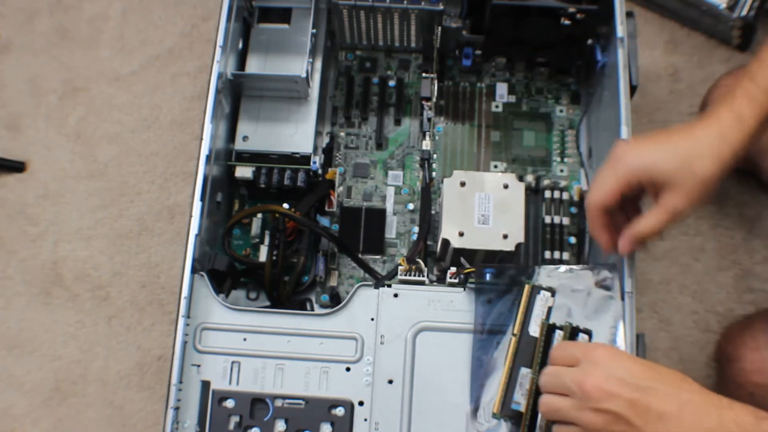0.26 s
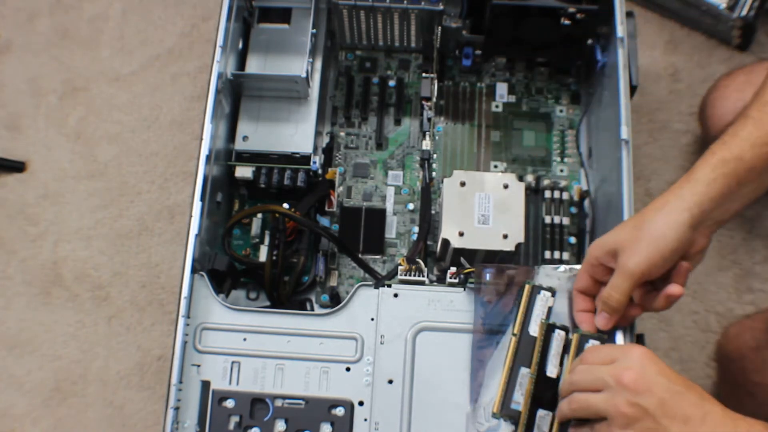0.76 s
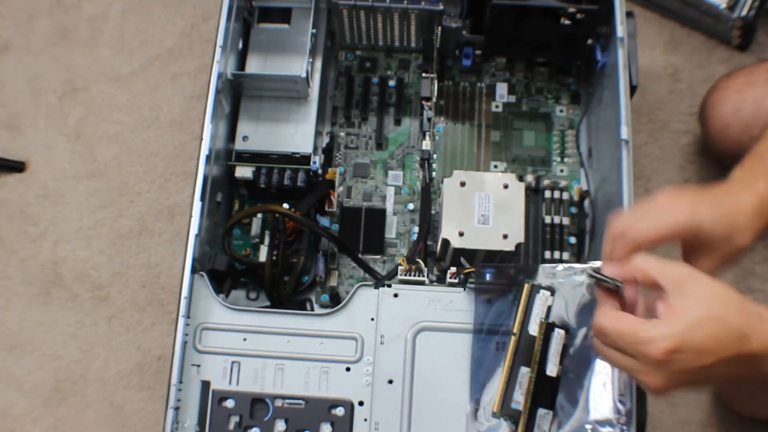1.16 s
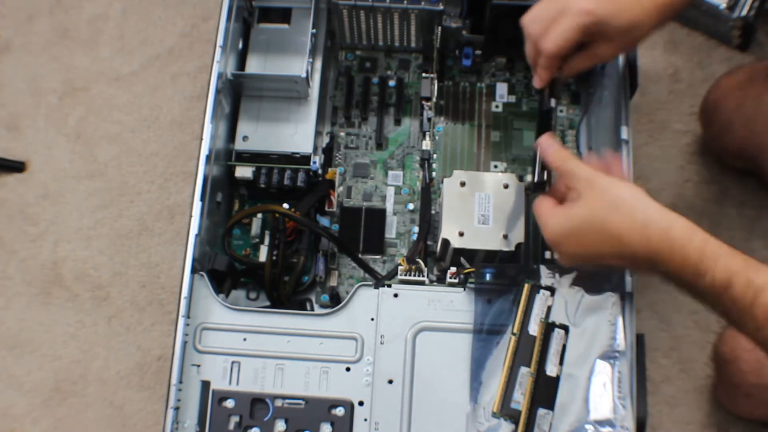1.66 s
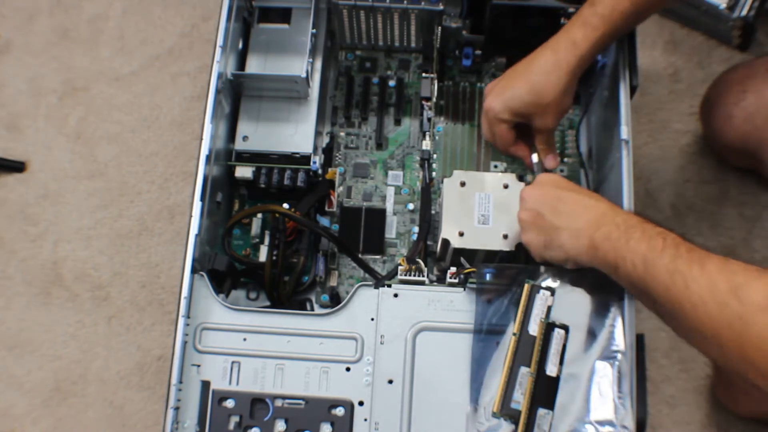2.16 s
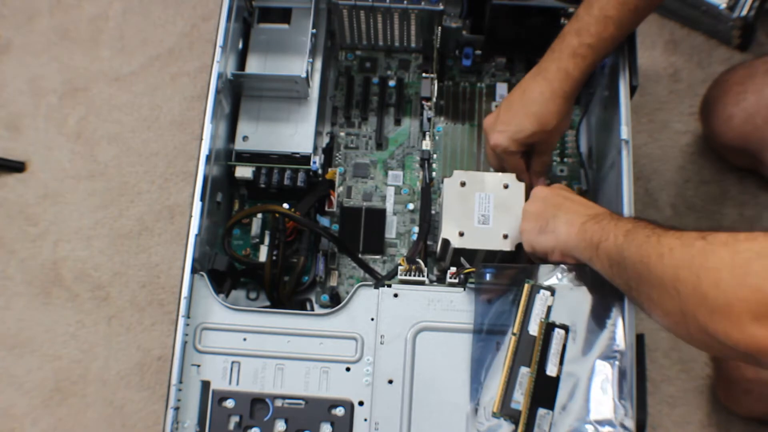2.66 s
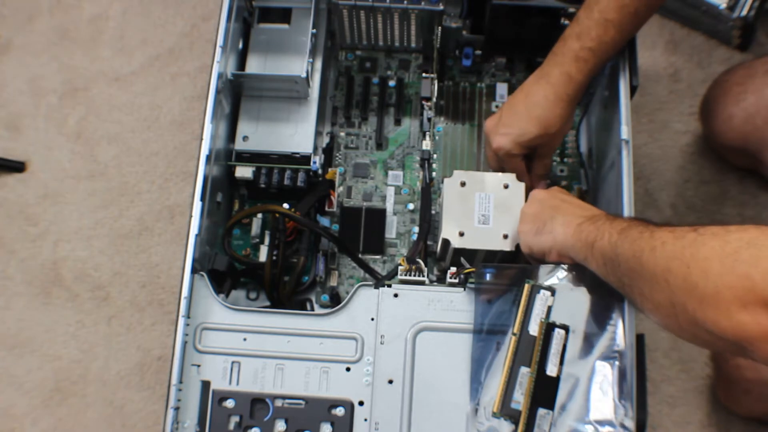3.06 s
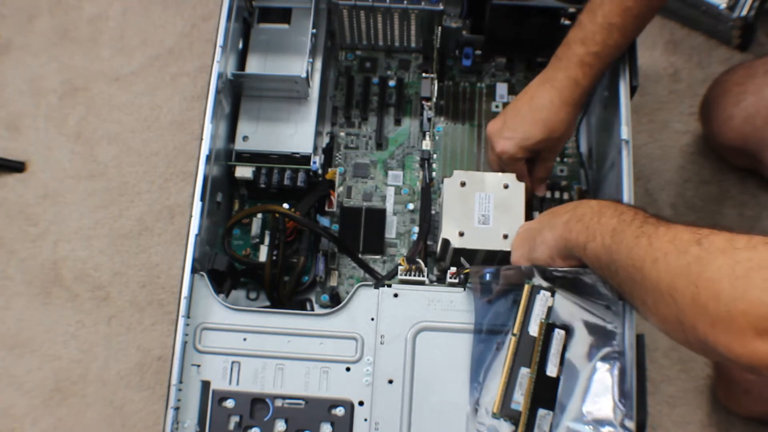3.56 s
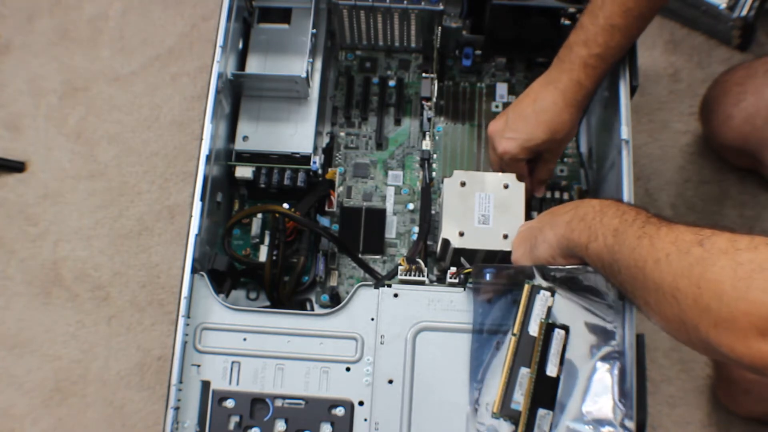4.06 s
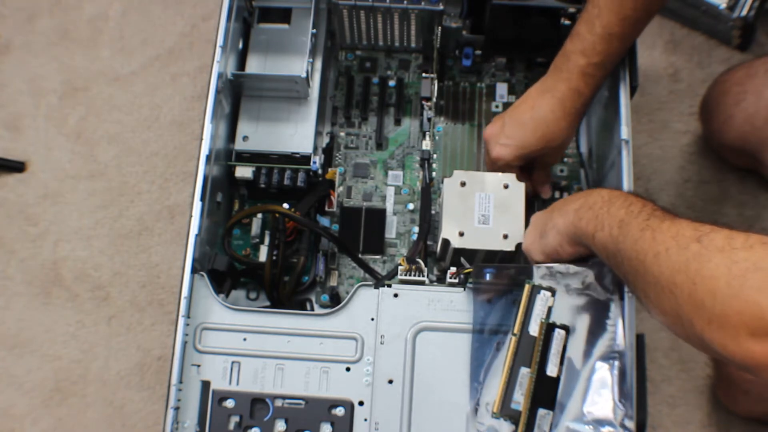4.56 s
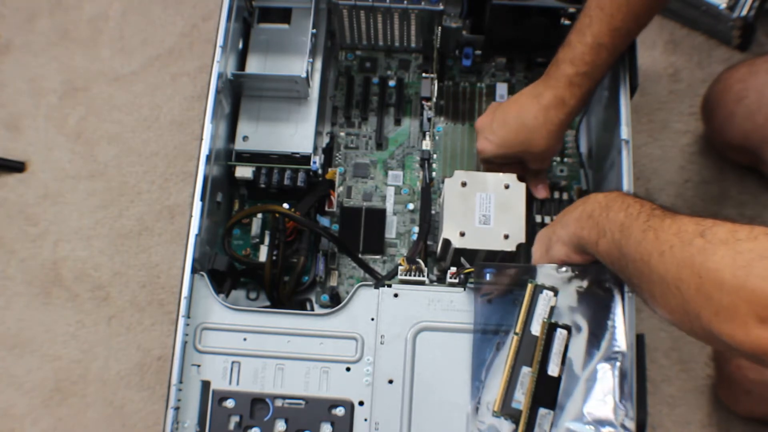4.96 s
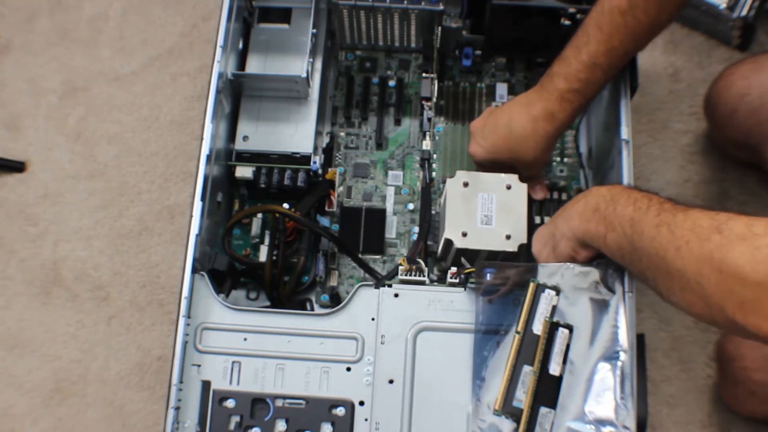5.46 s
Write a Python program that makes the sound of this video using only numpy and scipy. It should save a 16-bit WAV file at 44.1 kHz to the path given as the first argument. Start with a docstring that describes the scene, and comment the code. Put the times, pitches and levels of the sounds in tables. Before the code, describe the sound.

A half-second of low hum and room tone, then a brief cluster of hollow clacks and plastic ticks as modules are picked up from foil. A pause, then light gritty sliding, wiggling and small taps against a circuit board and sheet metal. Quiet pressing ends in one very loud, sharp snap. Close microphone, short room echo, faint hiss.

```python
"""Indoors, close to a steel computer case on carpet: hands lift memory modules off a foil bag lying on it,
slide one into its slot and press until the latch snaps. Bursts of gritty force ring modes of the case,
the panels and the circuit board, with fizz where surfaces rub; plastic and foil tick through single resonances.
Mains hum, shaped room noise and microphone hiss lie below; a gain control ducks after the loudest blows."""
import sys
import numpy as np
from scipy import signal
from scipy.fft import rfft, irfft, next_fast_len
from scipy.io import wavfile
from scipy.ndimage import uniform_filter1d, map_coordinates

SR = 44100
rng = np.random.default_rng(int(sys.argv[2]) if len(sys.argv) > 2 else 0)


def store_wav(level_fs):
    """Save 16-bit WAV to argv[1]."""
    pcm = np.round(np.clip(np.atleast_2d(level_fs), -1, 1) * 32767)
    wavfile.write(sys.argv[1], SR, pcm.T.astype(np.int16))


N = 251370


def amp(db):
    """Decibels to gain."""
    return 10 ** (np.asarray(db) / 20)


def unit(x):
    """Scales a sound to rms 1."""
    return x / np.sqrt(np.mean(np.abs(x) ** 2) + 1e-20)


def along(points, hz):
    """Reads a curve of (Hz, value) points on a log frequency axis."""
    point_hz, values = np.transpose(points)
    return np.interp(np.log(hz + 1), np.log(point_hz + 1), values)


def wobble(rate):
    """A smooth random curve with rate knots a second."""
    knots = rng.standard_normal(int(N * rate / SR) + 4)
    return map_coordinates(knots, [np.arange(N) * rate / SR])


def filtered(x, response):
    """Multiplies the spectrum of x by a response of frequency."""
    m = next_fast_len(N + SR // 2)
    hz = np.fft.rfftfreq(m, 1 / SR)
    return irfft(rfft(x, m) * response(hz), m)[..., :N]


def mains_hum():
    """Mains hum: sines at the supply pitch and its multiples, wavering in level and phase."""
    # Each row: pitch in Hz, level in dB before the 5 dB lift below.
    hum_lines = [(60, -50.5), (120, -66), (240, -63)]
    t = np.arange(N) / SR
    hum = np.zeros(N)
    for hz, db in hum_lines:
        level_db = db + 5.0 + 0.51 * wobble(24) + 0.17 * wobble(5.7)
        hum += amp(level_db) * np.sin(2 * np.pi * hz * t + 0.15 * wobble(12))
    return hum


def room_noise():
    """Room noise, alike at both microphone ports: white noise shaped in frequency."""
    # Each row: frequency in Hz, relative density in dB per Hz.
    room_curve = [(15, -30), (30, -3), (48, -2), (80, -4), (105, -6), (150, -2.5), (250, -0.5), (400, 0),
                  (500, -3.5), (660, -1.5), (900, -3.5), (1400, -6), (1650, -12.5), (2500, -13),
                  (5000, -18), (15700, -22.5)]
    noise = filtered(rng.standard_normal(N), lambda hz: amp(along(room_curve, hz)))
    return amp(-47.5) * unit(noise)  # dB rms


def capsule_hiss():
    """Microphone hiss: shaped noise of opposite sign at the two ports."""
    # Each row: frequency in Hz, relative density in dB per Hz.
    hiss_curve = [(15, -80), (25, -56), (107, 2.5), (413, -2.5), (14500, 0.5), (15700, -4)]
    hiss = unit(filtered(rng.standard_normal(N), lambda hz: amp(along(hiss_curve, hz))))
    return amp(-56.5) * np.array([hiss, -hiss])  # dB rms


def add(out, s, sound):
    """Puts a sound at s seconds with the room's answer, in which each frequency dies at its own speed."""
    # Each row: frequency in Hz, time to die by 60 dB in seconds.
    wall_t60 = [(200, 0.3), (1200, 0.23), (4000, 0.2), (12000, 0.1)]
    hz, t, z = signal.stft(rng.standard_normal(SR // 3), SR, nperseg=256)
    decay = amp(-60 * t / along(wall_t60, hz)[:, None])
    tail = signal.istft(z * decay, SR, nperseg=256)[1]
    echo = signal.fftconvolve(sound, amp(-9.5) * tail / np.linalg.norm(tail))
    out[round(s * SR):][:len(sound)] += sound
    out[round((s + 0.005) * SR):][:len(echo)] += echo  # the walls answer 5 ms later


def ticks():
    """Plastic edges and foil creases: tiny noise cracks, each heard through a broad resonance used twice."""
    # Each row: start in seconds, peak in dB before the room's answer, pitch in Hz.
    tick_rows = [(0.523, -15.5, 3400), (0.5923, -12.5, 6200), (0.681, -42, 7500), (0.736, -25.5, 2600),
                 (0.8026, -27, 2700), (0.833, -24, 5380), (0.8826, -18, 5600), (0.8975, -23, 5670),
                 (0.907, -34, 7000), (1.247, -34, 12500), (1.262, -32, 12500), (1.31, -44, 12000),
                 (2.403, -44, 6000), (3.428, -32, 2100), (4.806, -37, 11100), (4.825, -34.5, 9000),
                 (5.162, -30.5, 4970), (5.165, -34.5, 9900), (5.168, -35.5, 14000), (5.183, -20, 5300),
                 (5.246, -31.5, 5100)]
    crack_t60 = 0.004  # s
    out, t = np.zeros(N + SR), np.arange(SR // 50) / SR
    f = np.fft.rfftfreq(len(t), 1 / SR)
    for s, db, hz in tick_rows:
        crack = amp(-60 * t / crack_t60) * rng.standard_normal(len(t))
        width = 0.41 * hz  # Hz
        ring = 1j * f * width / (hz * hz - f * f + 1j * f * width)
        tick = irfft(rfft(crack) * ring ** 2)
        add(out, s, amp(db) * tick / np.abs(tick).max())
    return out[:N]


def modes(table, hz, near_hz, db_per_octave):
    """Causal resonances at slightly new strengths, weaker the further they lie from the favoured pitch."""
    new_db = 1.5 * rng.standard_normal(len(table))
    total = 0
    for k, (pitch, width, db) in enumerate(table):
        level_db = db + new_db[k] - db_per_octave * abs(np.log2(pitch / near_hz))
        resonance = 1j * hz * width / (pitch * pitch - hz * hz + 1j * hz * width)
        total = total + (-1) ** k * amp(level_db) * resonance  # neighbours alternate in sign
    return total


def dull(hz):
    """The panels and the board carry little treble: a two-pole fade above 6000 Hz."""
    return 1 / (1 + 1j * hz / 6000) ** 2


def case_thud(hz, near_hz):
    """The case on the carpet: low modes, with little sound leaving it well below the favoured pitch."""
    # Each row: pitch in Hz, width in Hz, strength in dB before the variation in modes().
    thud_modes = [(187, 62, 3.5), (270, 33, 2.5), (367, 39, 2), (479, 52, 2), (604, 128, 4.5)]
    small = (1j * hz / (1j * hz + 0.16 * near_hz)) ** 2
    return small * modes(thud_modes, hz, near_hz, db_per_octave=15.5)


def steel_panels(hz, near_hz, grip):
    """The case's steel panels: modes that the hands damp less than they damp the board."""
    # Each row: pitch in Hz, width in Hz before the grip, strength in dB before the variation in modes().
    panel_modes = [(677, 18, -11.5), (816, 33.5, 8), (991, 97, 6), (1008, 100, 4.5), (1074, 87, 1),
                   (1224, 29, 6), (1335, 35, 8.5), (1460, 125, 0.5)]
    held = [(pitch, grip ** 0.35 * width, db) for pitch, width, db in panel_modes]
    return dull(hz) * modes(held, hz, near_hz, db_per_octave=20)


def circuit_board(hz, near_hz, grip, s):
    """The circuit board: one set of modes while held loose, another once the slot grips it."""
    # Both tables, each row: pitch in Hz, width in Hz before the grip, strength in dB before modes() varies it.
    loose_modes = [(1650, 193, 3), (2138, 280, -0.5), (2760, 260, -4.5), (3385, 140, 2), (3740, 180, 3.5),
                   (4170, 250, 1.5), (5440, 920, -20.5)]
    seated_modes = [(1550, 120, -3), (2220, 56, -2), (2620, 55, -3.5), (3170, 240, -3), (4190, 48, 2.5),
                    (4850, 67, -2)]
    seated_at = 2.72  # s
    table = loose_modes if s < seated_at else seated_modes
    held = [(pitch, grip * width, db) for pitch, width, db in table]
    return dull(hz) * modes(held, hz, near_hz, db_per_octave=9)


def rubbing_fizz(hz):
    """Rubbing surfaces: the force itself heard through a smooth curve, without resonances."""
    # Each row: frequency in Hz, relative level in dB.
    fizz_curve = [(3000, -16), (4500, 4.5), (6000, 0.5), (9000, -8.5), (12000, -6), (16000, -21.5)]
    return amp(along(fizz_curve, hz))


def gritty_force(rise, t60, size):
    """Spectrum of a contact: uneven noise that swells and dies, with one blow halfway up the swell."""
    t = np.arange(size) / SR
    rise, t60 = np.clip(rise, 0.0002, 0.05), np.clip(t60, 0.004, 0.4)  # s
    swell = np.sin(np.pi / 2 * np.minimum(t / rise, 1)) ** 2
    push = swell * amp(-60 * np.maximum(t - rise, 0) / t60)
    slip_db = 2.2 * rng.standard_normal(size // 64).repeat(64)  # uneven slips
    grit = rng.standard_normal(size) * amp(slip_db)
    grit[round(rise * SR / 2)] += 0.0099 / rise  # the quicker the contact, the more it is one hard blow
    return rfft(grit * push)


def contacts():
    """Sudden and softer contacts: each burst of force drives the case, the panels, the board and the fizz."""
    # Sudden contacts. Each row: start in seconds, time to die by 60 dB in seconds (held to 0.004 to 0.4),
    # case level in dB, favoured case pitch in Hz, panel level in dB, board level in dB.
    # Levels are the rms of the loudest 10 ms, before the room's answer.
    sudden_rows = [(0.521, 0.064, -22.5, 470, -21, -20.5), (0.548, 0.043, -16.5, 447, -12, -18.5),
                   (0.559, 0.097, -25.5, 430, -20, -19.5), (0.605, .065, -23, 505, -15.5, -20),
                   (0.693, 0.028, -26.5, 580, -35.5, -32.5), (0.723, 0.038, -33, 510, -46, -41),
                   (0.762, 0.019, -37.5, 524, -44, -48), (0.785, .027, -42, 340, -37, -43),
                   (0.836, 0.1, -32.5, 392, -23.5, -18), (2.16, 0.0031, -35.5, 515, -28, -23.5),
                   (2.328, 0.13, -64, 400, -59, -39.5), (2.669, 0.16, -41, 565, -40.5, -31.5),
                   (2.894, 0.032, -33.5, 226, -38, -59), (2.939, 0.14, -41, 466, -63, -40),
                   (3.197, 0.065, -36, 433, -38.5, -37), (3.376, 0.08, -40, 424, -60, -67),
                   (3.428, 0.012, -44, 407, -44, -54), (3.439, 0.045, -35, 384, -32.5, -37.5),
                   (3.5, 0.021, -33, 380, -35.5, -24), (4.087, 0.073, -42, 325, -38, -47.5),
                   (4.798, 0.11, -26, 202, -25.5, -44.5), (5.056, 0.087, -40, 430, -39.5, -58),
                   (5.182, 0.011, -31.5, 480, -36, -31), (5.379, 0.023, -11.5, 340, 3, -5.5),
                   (5.389, 0.055, -31, 463, -35, -16)]
    # Contacts with a softer onset: soft knocks, scrapes and rubs. Each row: start in seconds, swell in
    # seconds, then the columns of the sudden contacts from the dying time on.
    soft_rows = [(0.501, .005, 0.08, -19, 523, -26, -31.5), (0.535, .008, 0.031, -24.5, 470, -25, -23),
                 (0.63, .004, 0.021, -26, 366, -25, -56), (0.672, .004, 0.019, -27, 530, -37, -57),
                 (0.927, 0.025, 0.079, -41, 464, -29.5, -24), (0.958, .0035, 0.041, -26, 463, -17, -21.5),
                 (1.245, .006, 0.053, -63, 410, -65, -53), (2.055, .043, 0.49, -50, 394, -43.5, -47),
                 (2.113, .022, 0.065, -40, 395, -37, -29), (2.17, .011, 0.41, -45, 310, -46, -50),
                 (2.3, .004, 0.17, -63, 393, -50, -41), (2.386, .02, 0.19, -46, 377, -59, -37),
                 (2.418, .02, 0.27, -45, 362, -41.5, -30), (2.478, .012, 0.11, -41.5, 380, -42, -26),
                 (2.515, .01, 0.043, -65, 294, -45, -37), (2.577, .0045, 0.11, -36, 373, -35, -25),
                 (2.605, .0065, 0.22, -41.5, 430, -41.5, -34), (2.761, .004, 0.25, -45, 373, -46, -41.5),
                 (2.867, .014, 0.12, -45.5, 230, -38.5, -51.5), (3.002, .005, 0.21, -51, 382, -49.5, -43.5),
                 (3.081, .004, 0.11, -69, 290, -56, -43), (3.118, .006, 0.25, -53, 365, -64, -48),
                 (3.215, .048, .2, -47, 450, -40, -35.5), (3.405, .021, 0.032, -40, 474, -56, -54),
                 (3.724, .009, 0.055, -64, 280, -37.5, -43), (4.305, .048, 0.17, -35.5, 320, -38, -45.5),
                 (4.4, .0066, 0.082, -42, 283, -44.5, -54), (4.453, .01, 0.11, -44, 213, -44, -48.5),
                 (4.744, .014, 0.27, -42.5, 200, -44, -55), (4.806, .004, 0.072, -35, 209, -33.5, -33),
                 (4.961, .004, 0.11, -51, 393, -41, -43), (5.232, .0095, 0.044, -42.5, 380, -43.5, -48),
                 (5.369, .0026, 0.019, -22.5, 437, -2, -20)]
    # Stages of the work. Each row: start in seconds, favoured panel pitch in Hz, favoured board pitch in Hz,
    # fizz over the board in dB, factor by which the grip widens the board's ring.
    # In order: the stack of modules is nudged, one is worked loose, the rest settle, it tips against its
    # neighbour, is lifted clear, carried over and set on the slot, slid down the guides, wiggled into the
    # contacts; fingers slide along it, thumbs find the top edge, bear down, push harder; the latch snaps.
    stage_rows = [(0, 1350, 2800, -11, 1.1), (0.53, 860, 1940, -11, 2.1), (0.6, 890, 2130, -24, 1.2),
                  (0.82, 824, 2230, -17.5, 1.5), (0.92, 1015, 2330, -10, 0.82), (1.1, 1150, 3000, -6, 1.8),
                  (2.25, 1010, 2560, -7.5, 1.5), (2.72, 930, 2650, -8, 1.7), (3.17, 1000, 2780, -7.5, 4.3),
                  (3.35, 990, 2050, -35, 3.9), (3.47, 1000, 3270, -25, 3.2), (4.6, 1040, 3080, -24, 3.5),
                  (5.3, 1117, 2660, -10.5, 6.4)]
    size, sudden_rise = 16384, 0.00099  # samples, s
    out, hz = np.zeros(N + SR), np.fft.rfftfreq(size, 1 / SR)
    rows = [(s, sudden_rise, *rest) for s, *rest in sudden_rows] + list(soft_rows)
    for s, rise, t60, thud_db, thud_hz, panel_db, board_db in rows:
        _, panel_hz, board_hz, fizz_db, grip = [stage for stage in stage_rows if stage[0] <= s][-1]
        force = gritty_force(rise, t60, size)
        sound = 0
        for db, response in [(thud_db, case_thud(hz, thud_hz)),
                             (panel_db, steel_panels(hz, panel_hz, grip)),
                             (board_db, circuit_board(hz, board_hz, grip, s)),
                             (board_db + fizz_db, rubbing_fizz(hz))]:
            part = irfft(force * response)
            loudest = np.sqrt(uniform_filter1d(part ** 2, size=441).max())  # rms over 10 ms
            sound = sound + amp(db) * part / loudest
        add(out, s, sound)
    return out[:N]


def scene():
    """Hands at work over hum, room noise and hiss."""
    background = mains_hum() + room_noise() + capsule_hiss()
    return background + ticks() + contacts()


def record(dry):
    """Gain control turns down soon after loud sound and recovers at a steady dB rate; faster peaks clip."""
    limit_db, ratio = -14, 0.93  # threshold, dB of cut per dB above it
    release_db, attack = 35, 0.028  # dB per s, s
    top_hz = 15750  # nothing passes from here up
    level_db = 10 * np.log10(np.abs(uniform_filter1d(dry[0] ** 2, size=441)) + 1e-12)
    ramp = release_db * np.arange(N) / SR
    wanted_db = ratio * np.maximum(level_db - limit_db, 0)
    cut_db = np.maximum.accumulate(wanted_db + ramp) - ramp  # falls back no faster than the ramp
    lag = int(attack * SR)
    cut_db = uniform_filter1d(cut_db, size=lag, origin=(lag - 1) // 2)  # a mean over the past only
    wet = np.clip(dry * amp(-np.maximum(cut_db, 0)), -1, 1)
    return np.clip(filtered(wet, lambda hz: hz < top_hz), -1, 1)


dry = scene()
out = record(dry)
store_wav(out)
```